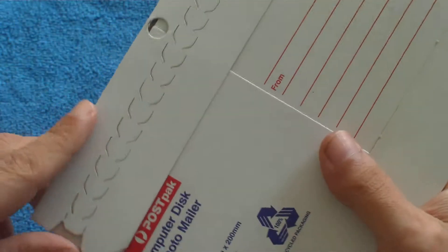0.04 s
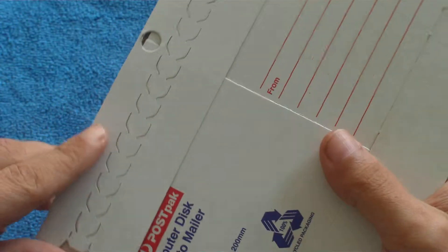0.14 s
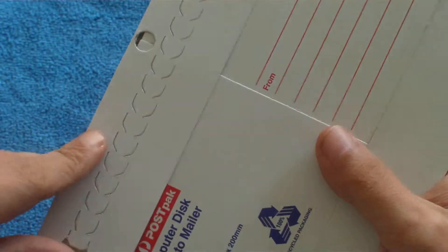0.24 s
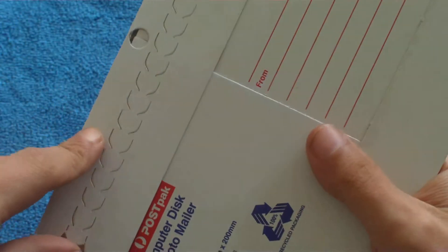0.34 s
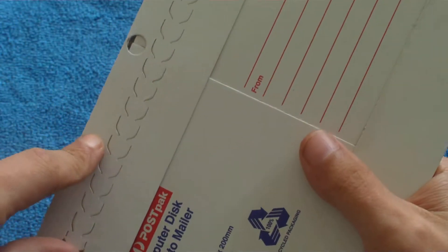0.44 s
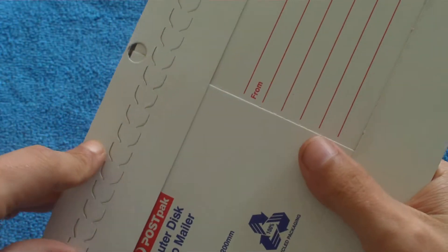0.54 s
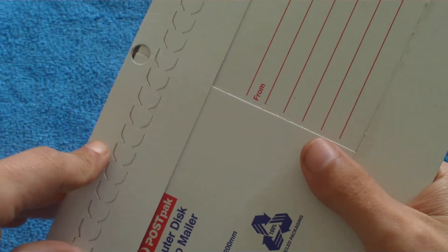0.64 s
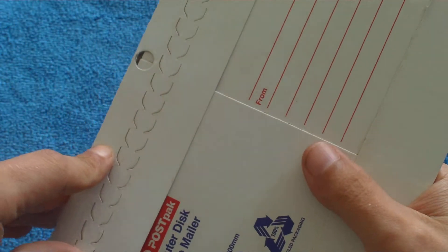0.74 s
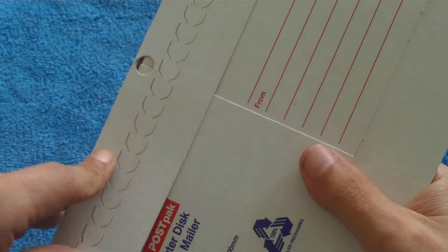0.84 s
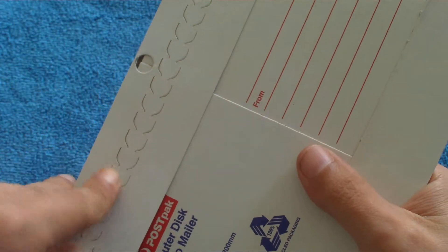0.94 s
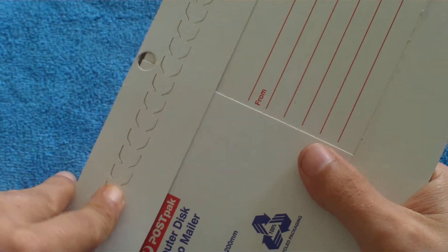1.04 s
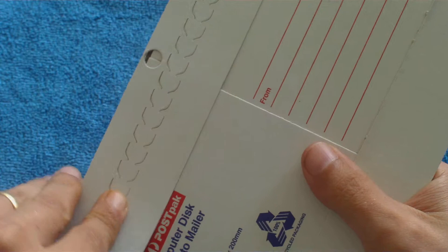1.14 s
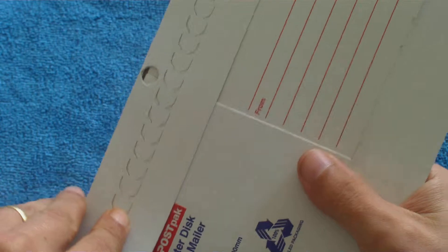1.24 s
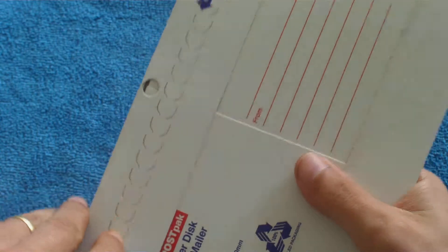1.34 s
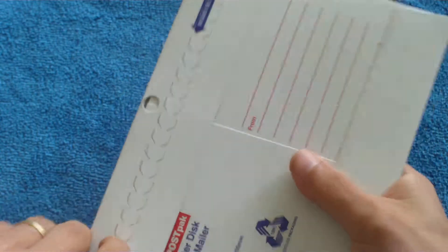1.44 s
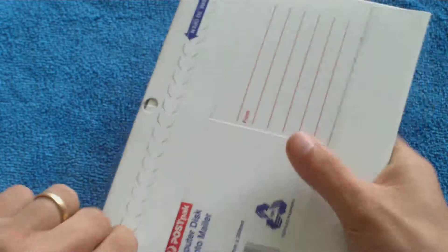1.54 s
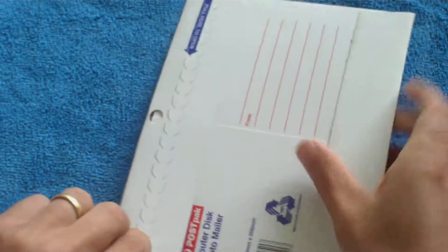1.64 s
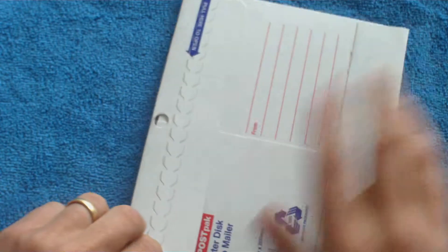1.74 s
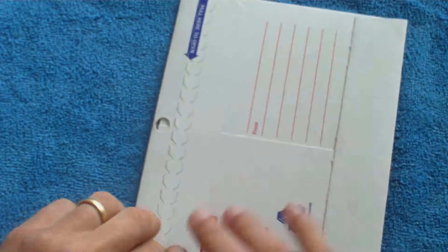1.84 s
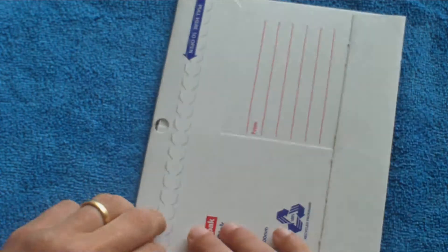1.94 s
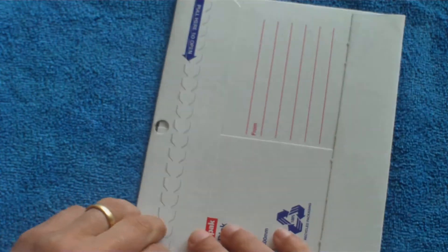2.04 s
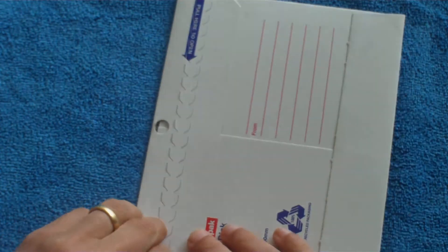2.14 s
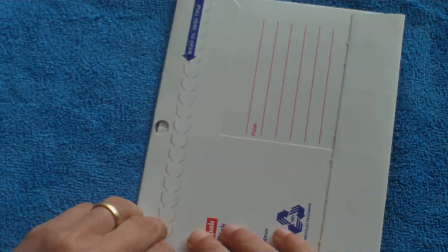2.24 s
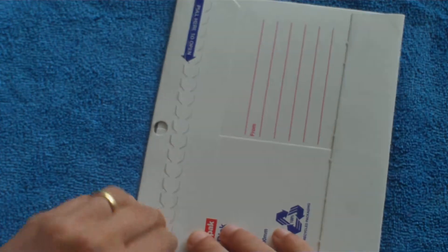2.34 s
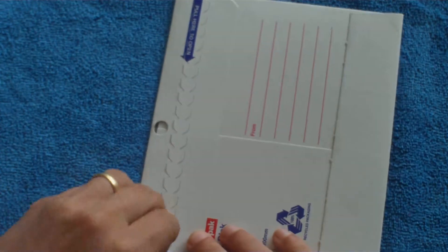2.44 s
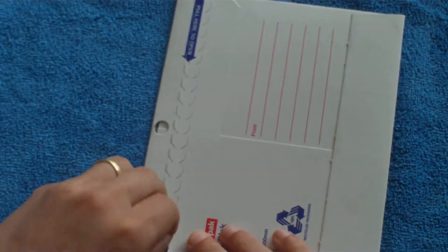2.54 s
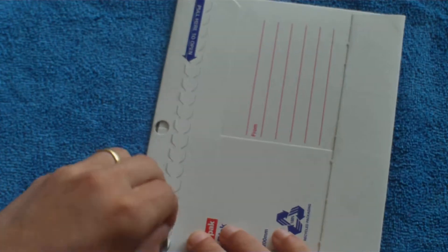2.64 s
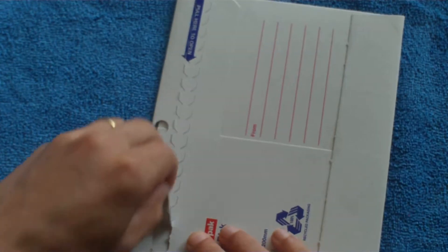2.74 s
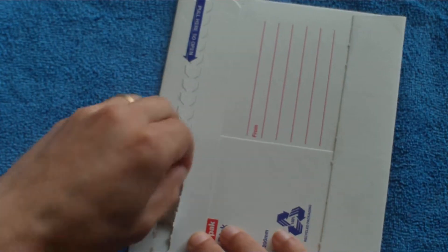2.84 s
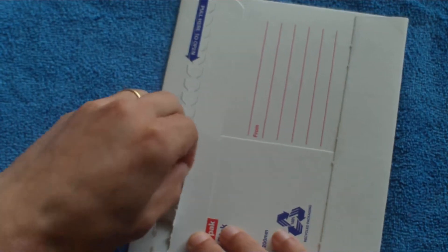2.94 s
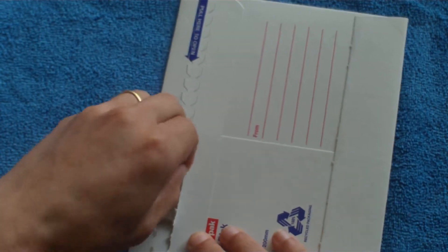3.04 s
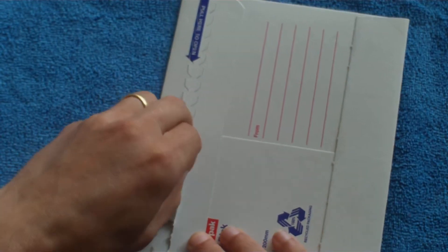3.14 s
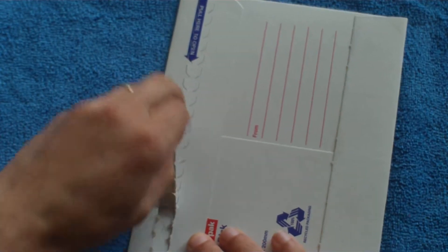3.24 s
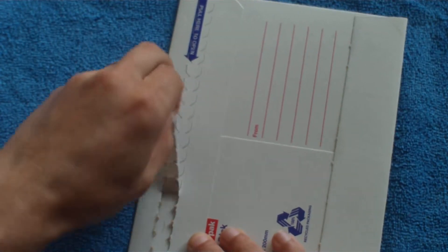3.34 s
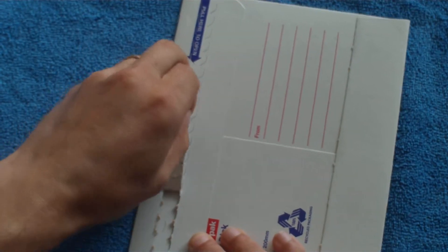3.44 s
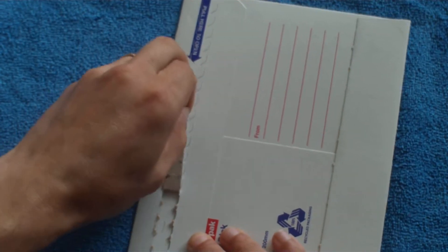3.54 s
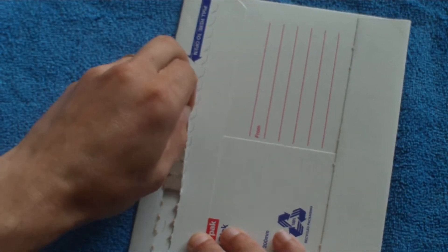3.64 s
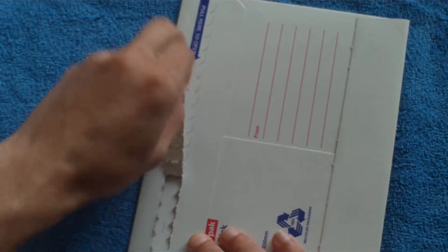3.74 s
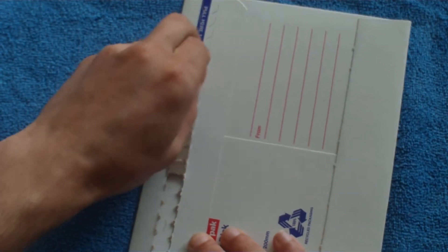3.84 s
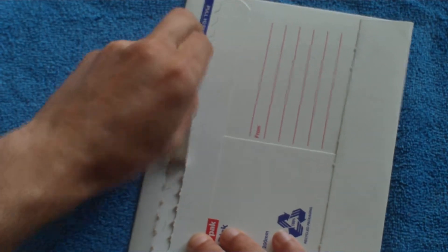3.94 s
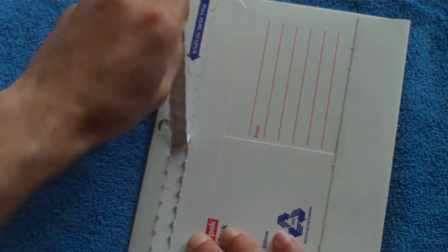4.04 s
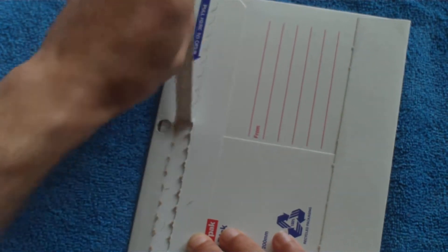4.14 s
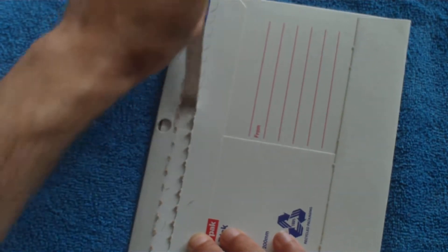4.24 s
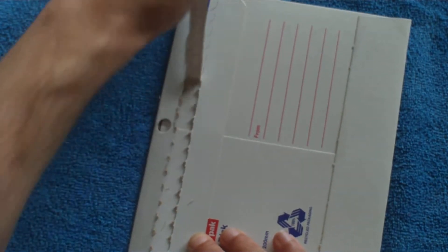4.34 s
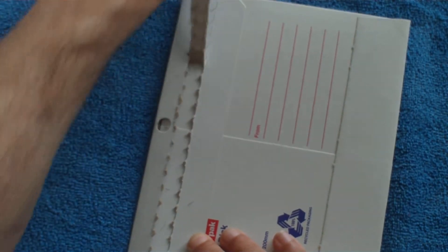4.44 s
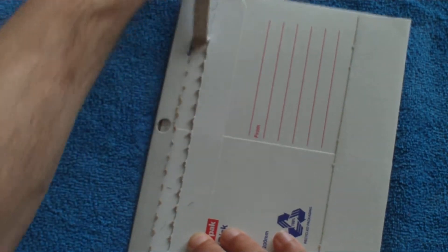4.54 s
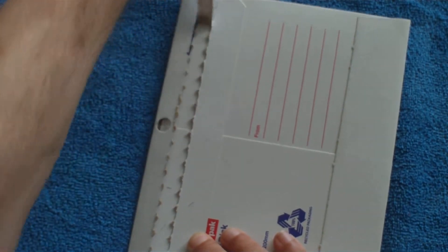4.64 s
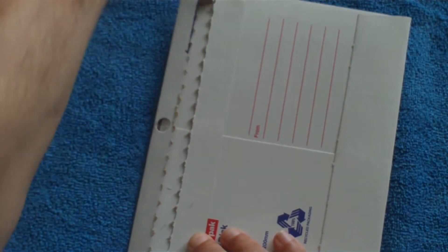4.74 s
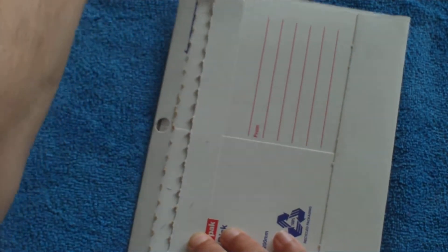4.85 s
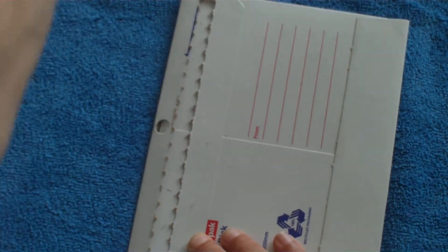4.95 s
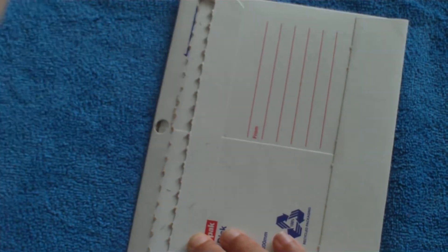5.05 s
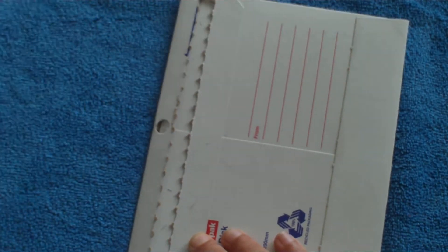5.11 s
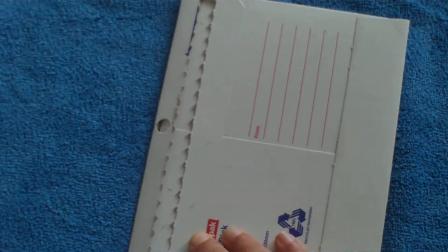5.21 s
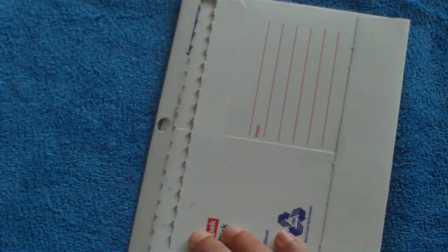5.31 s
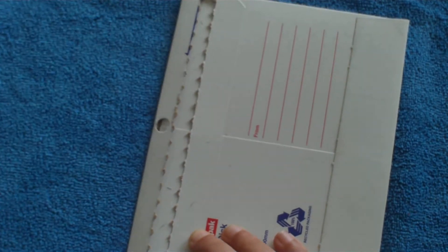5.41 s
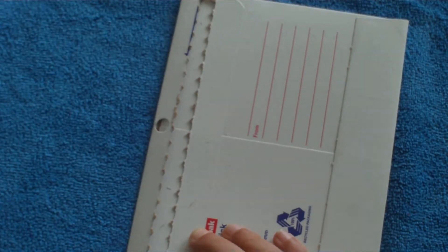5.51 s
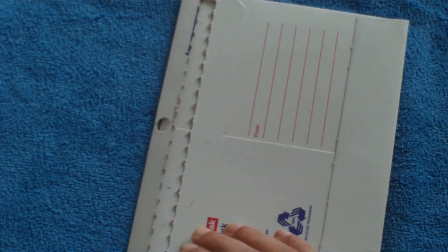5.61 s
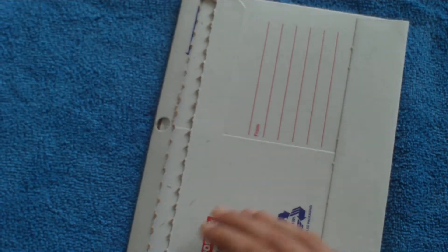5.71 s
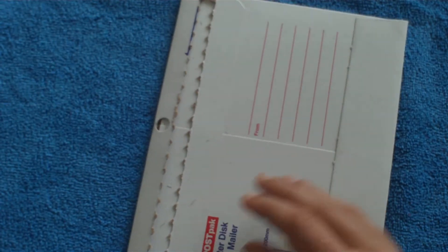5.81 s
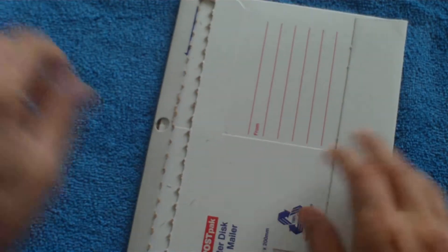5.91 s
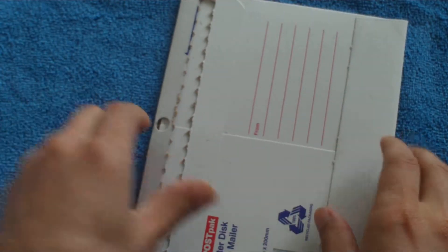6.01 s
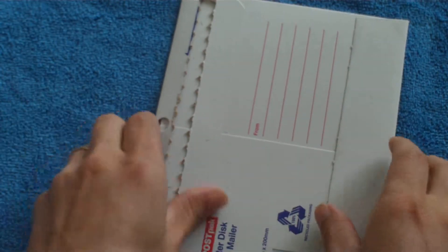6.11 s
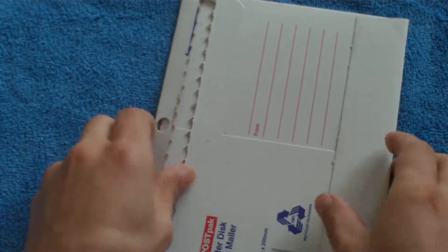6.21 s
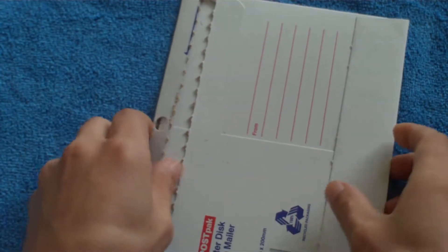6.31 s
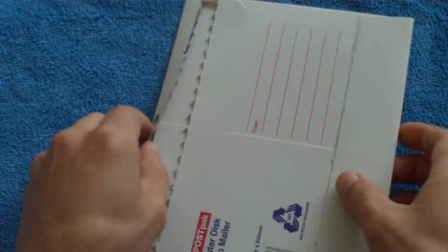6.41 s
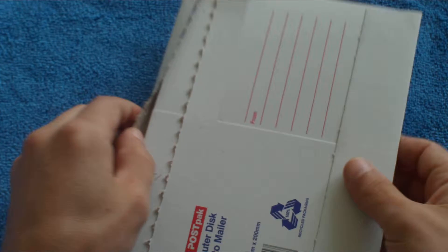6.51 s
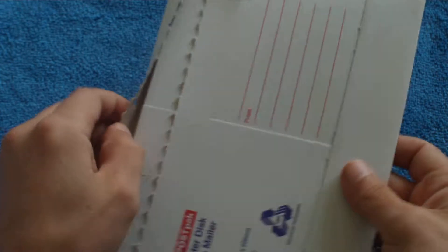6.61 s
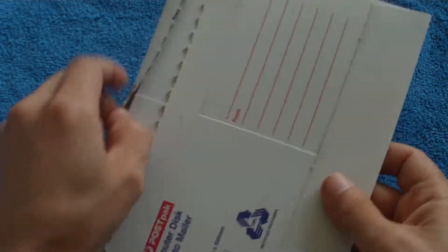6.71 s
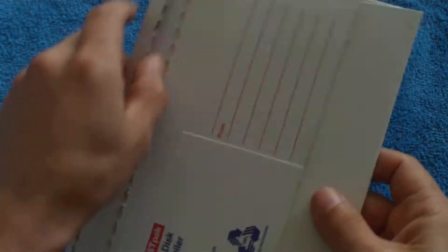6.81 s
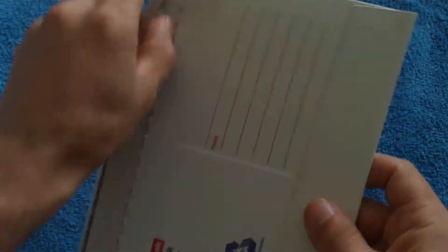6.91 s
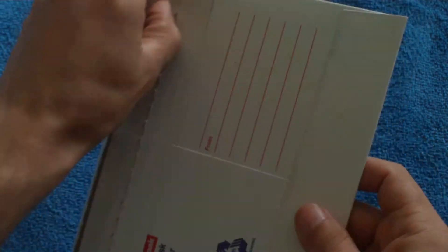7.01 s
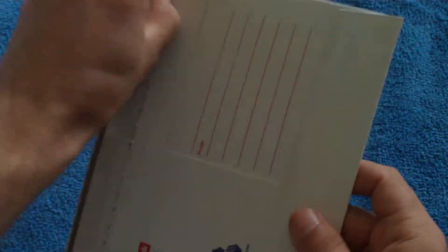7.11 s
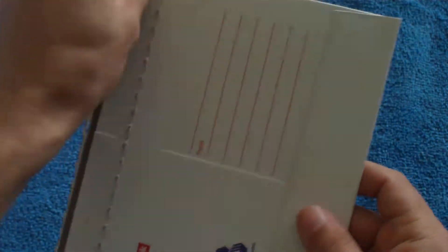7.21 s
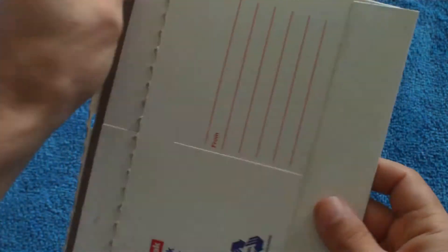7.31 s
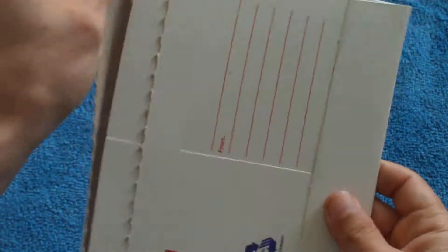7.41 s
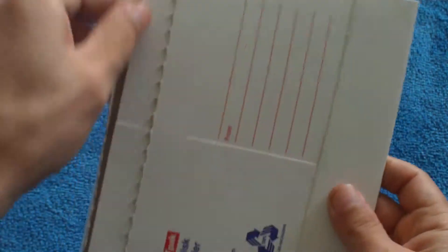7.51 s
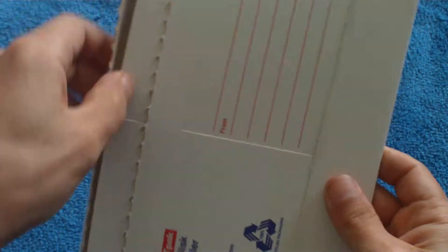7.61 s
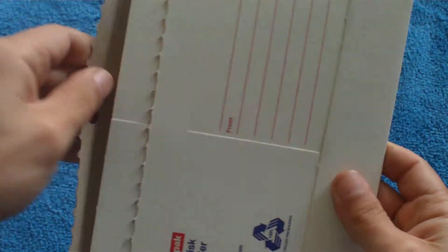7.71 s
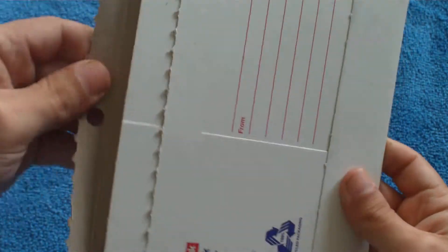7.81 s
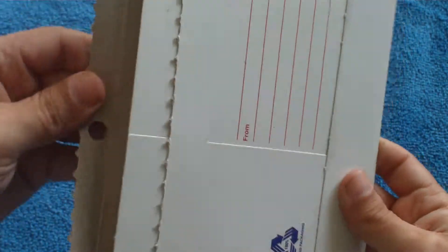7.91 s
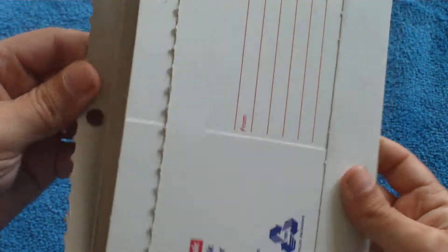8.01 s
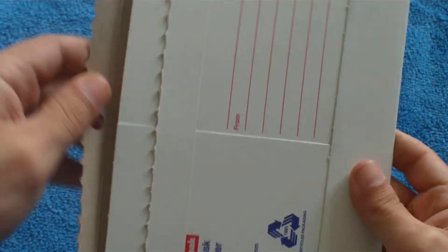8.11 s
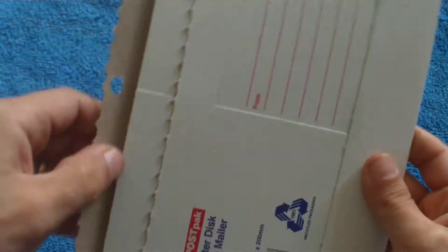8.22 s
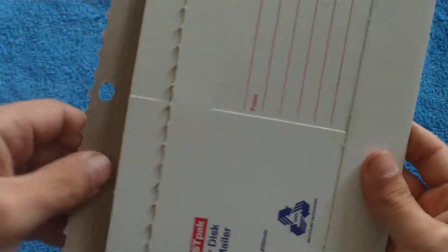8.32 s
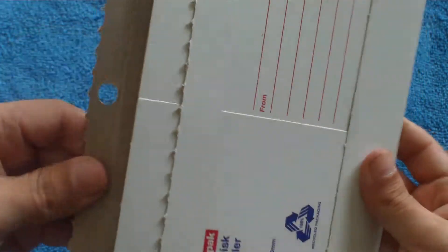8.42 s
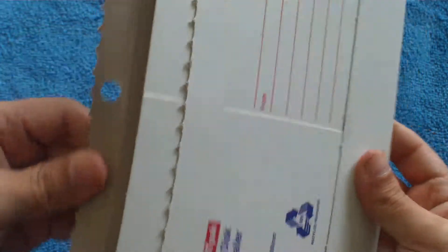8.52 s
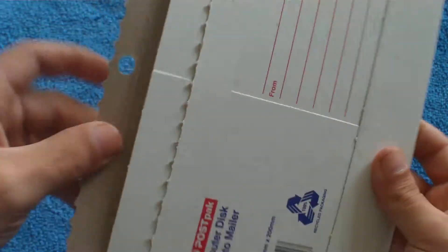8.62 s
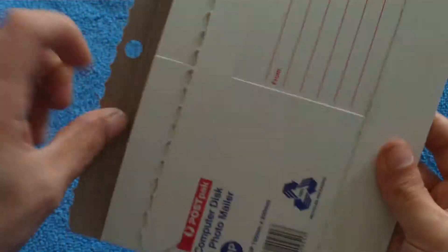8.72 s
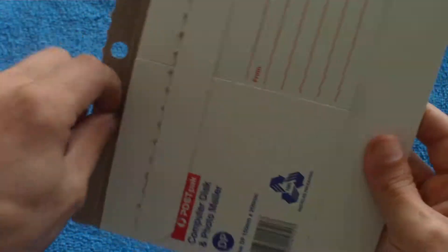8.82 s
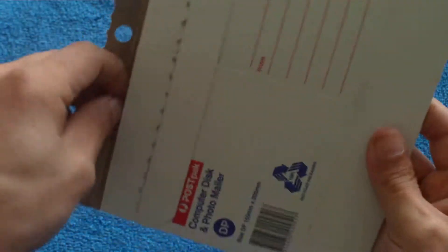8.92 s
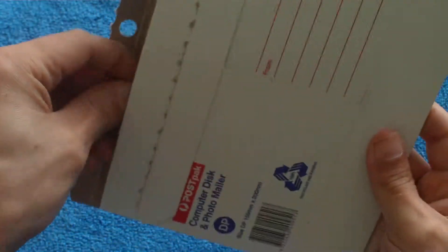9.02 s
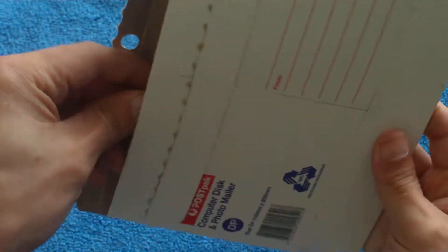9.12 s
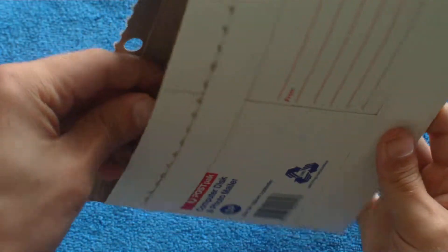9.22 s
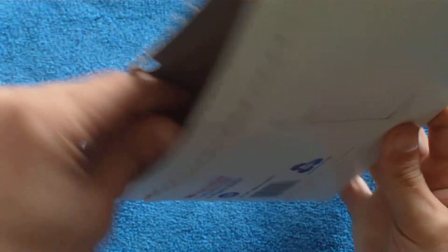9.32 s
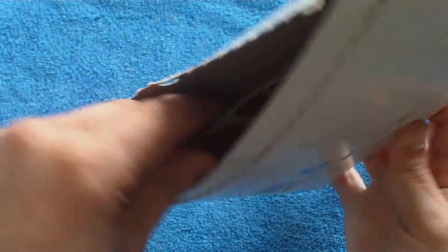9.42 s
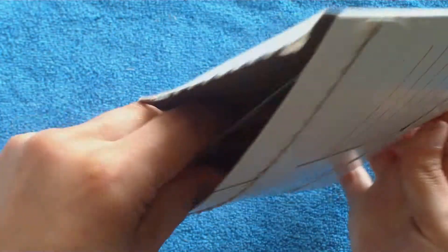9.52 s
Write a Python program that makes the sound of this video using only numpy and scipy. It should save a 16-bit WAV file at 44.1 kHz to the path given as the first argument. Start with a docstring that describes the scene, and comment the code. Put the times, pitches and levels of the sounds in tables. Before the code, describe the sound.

Loud, dry cardboard pops accelerate as a tear strip is pulled, followed by quiet handling rustles and a few light clicks indoors.

```python
"""Perforation bridges snap as hands pull the tear strip of a stiff cardboard mailer lying on a towel, close by:
each snap is a noise burst of a few ms that excites resonances of body, panel, strip and cut edge.
Fibres crackle between the snaps and fingers and towel rub the board: uneven grains over a fine hiss,
through fixed resonances. A small room of sparse decaying taps answers; steady hiss, a low hum and
a late drone lie underneath. The loudest snaps overload the input, and one microphone feeds both channels."""
import sys
import numpy as np
from scipy import signal
from scipy.fft import rfft, irfft
from scipy.io import wavfile
from scipy.ndimage import uniform_filter1d, map_coordinates

SR = 44100
rng = np.random.default_rng(int(sys.argv[2]) if len(sys.argv) > 2 else 0)


def int16_out(signal):
    """Quantize to a 16-bit WAV file."""
    q = np.round(np.clip(np.atleast_2d(signal).T, -1, 1) * 32767)
    wavfile.write(sys.argv[1], SR, q.astype(np.int16))


N = 421596


def gain_of(db):
    """Level law: decibels to amplitude ratio."""
    return 10 ** (np.asarray(db) / 20)


def evened(x):
    """Power normalization: scales to rms 1."""
    return x / np.sqrt(np.mean(x ** 2) + 1e-20)


def read(points, hz):
    """Spectral interpolation: reads a frequency table on a log-frequency axis."""
    f, value = np.transpose(points)
    return np.interp(np.log(hz + 1), np.log(f + 1), value)


def track(rows, column, outside):
    """Linear interpolation in time: one table column over the scene, a set value outside the rows."""
    rows = np.array(rows)
    return np.interp(np.arange(N) / SR, rows[:, 0], rows[:, column], left=outside, right=outside)


def resonate(x, hz, width):
    """Damped resonance: a pole pair whose radius sets the bandwidth, with a peak gain of about 1."""
    radius = np.exp(-np.pi * width / SR)
    feedback = [1, -2 * radius * np.cos(2 * np.pi * hz / SR), radius * radius]
    return signal.lfilter([1 - radius, 0, radius - 1], feedback, x)


def slow(rate):
    """Band-limited random modulation: cubic curve through `rate` random knots per second, rms 1."""
    knots = rng.standard_normal(int(N / SR * rate) + 3)
    return evened(map_coordinates(knots, [np.arange(N) / SR * rate], order=3))


# spectral shape of the background noise, relative: [hz, level_db]
HISS_SPECTRUM = [(15, -33), (25, -9.5), (65, -8.5), (90, -8), (208, -9.5), (290, -6), (610, -7.5),
                 (910, -7), (2000, -11), (6100, -11.5), (7000, -17), (7250, -26), (7400, -57)]
HISS_DB = -37.5  # rms level, before the faint swells


def hiss():
    """Stationary coloured noise of microphone and room: filtered white noise with faint slow swells."""
    hz = np.fft.rfftfreq(N, 1 / SR)
    spectrum = rfft(rng.standard_normal(N)) * gain_of(read(HISS_SPECTRUM, hz))
    return gain_of(HISS_DB + 0.17 * slow(2.3)) * evened(irfft(spectrum, N))


def wavering_tone(level_db, hz):
    """Frequency modulation: phase is the running sum of pitch; the level is an rms level."""
    return np.sqrt(2) * gain_of(level_db) * np.sin(2 * np.pi * np.cumsum(hz) / SR)


def hum():
    """Sustained sinusoid that wavers slightly in level and pitch around 120 Hz."""
    return wavering_tone(-49.5 + 1.6 * slow(4.7), 120 + 1.35 * slow(4.6))


# bridges and folds that snap; body, panel and strip levels are relative to the edge,
# and burst length is before stretching:
# [start_s, peak_db, burst_ms, body_db, panel_db, panel_hz, strip_db, strip_hz]
SNAPS = [(0.611, -24, 5.5, 1, 4, 915, -1, 2310), (0.972, -20, 4.3, 19, 15, 910, 0, 2940),
         (1.281, -4, 4.4, -9.5, -1, 624, -7, 2810), (1.305, -15.5, 2, 10, 15, 910, 18, 2200),
         (1.386, -23.5, 9.3, 8, 15, 810, 6, 3240), (2.44, 2, 6.6, -8.5, 5.5, 1215, -6, 3160),
         (2.444, 4.5, 9.9, -3, 14, 979, -7, 3080), (2.708, -7, 9.4, -27, -3, 1090, -6.5, 3120),
         (2.776, 1.5, 4.5, -8, -7.5, 800, -12.5, 2040), (2.808, -7, 8.1, -19, 0.5, 1030, -1, 1810),
         (2.857, -2, 10, -14, -3, 1090, -1, 3100), (3.322, -6, 4.9, -12, 8, 1060, 3, 3200),
         (3.327, 2, 6.4, -21.5, -5.5, 1050, -12, 3160), (3.38, -8.5, 7.5, -6, -1, 1180, -4, 2960),
         (3.394, 3.5, 3.7, -32, -10, 980, -14, 2950), (3.804, -11, 12, -21, -9.5, 1440, -14, 2750),
         (3.814, -8, 3.2, -9.5, -1, 1010, -9, 2960), (3.825, 1, 4.9, -26, -13, 1320, -16, 2880),
         (4.043, -9.5, 11, -12, -4, 1060, -8, 2620), (4.051, 1, 6.7, -33, -11, 1040, -12, 3020),
         (4.056, -5.5, 5.1, -16, 1, 1020, -7, 2720), (4.094, -1.5, 4.2, -8, 5, 895, -13, 2260),
         (4.098, 2, 6.5, -8, -22, 1020, -13.5, 2930), (4.154, -7, 4.3, -5, -5, 940, -7, 3100),
         (4.175, -6, 7, -5, -15, 940, -9.5, 2180), (4.229, -11.5, 8.1, -10, -15.5, 1430, -1, 2950),
         (4.249, -5.5, 5.8, -10, -4, 1000, -3, 2320), (4.318, 0, 3, -26, -25, 837, -10, 2240),
         (4.323, -6, 6.5, -20, -8.5, 1040, -3, 2230), (4.389, -4.5, 11.6, -14, -3.5, 905, -6.5, 2080),
         (4.444, 0.5, 5.1, -17, 3, 906, -3.5, 2060), (4.497, 0, 4.1, -24, -8, 1290, 3, 2130),
         (4.506, -8.5, 7.8, -7, -6, 1390, -11, 2310), (4.559, -5.5, 7, -8, 1.5, 840, 7, 2180),
         (4.571, -5, 9.3, -22, -5, 1050, -1, 2300), (4.636, -6, 7.8, -9.5, -8, 1044, 4, 1990),
         (4.644, -7.5, 8.7, -11, -12, 1430, -2, 2320), (4.714, -0.5, 5.4, -14, -6.5, 1010, -8.5, 2330),
         (4.772, -14, 10, -2, 8, 947, 7, 2400), (4.783, -1.5, 4.7, -7, 4, 1030, 3.5, 2240),
         (4.835, -5, 4.6, -7, 5, 1040, -13, 2370), (4.854, -5, 6.9, -19, -5, 1020, -2.5, 2250),
         (5.275, -9.5, 11.5, -8.5, 3, 1100, 10.5, 2250), (5.751, -25, 5.7, 3, 13, 1070, -5, 2730),
         (5.812, -17.5, 6.1, 9, 12, 720, 7, 2960), (7.0, -19.5, 8.1, -22, -6, 748, -15, 2350),
         (7.051, -14, 4.3, -13, 0, 1010, 6, 3010), (7.056, -16, 7.6, -18, 8, 1440, -3, 1670),
         (7.129, -13, 5.4, 3, 14, 1230, 7, 2740), (7.209, 1.5, 4.1, -9, 2.5, 820, 1, 2300),
         (7.484, -24, 4.9, -3, 16, 640, 6, 2330), (8.91, -14.5, 4.2, 11, 7.5, 923, 5, 2340),
         (8.945, -22, 6.4, -5.5, -2.5, 650, -7, 2370), (9.122, -16.5, 7.5, -5, 16.5, 1600, 16, 1940),
         (9.131, -20, 4.2, 6, 3, 931, 14, 2100), (9.315, -17.5, 9.2, -7, 12, 950, 5, 1960),
         (9.324, -18, 4.3, 3, 20, 965, 21, 2090)]
# bandwidths of the three ways the board rings, for a usual burst before spreading:
# [panel_hz, strip_hz, edge_hz]
RING_WIDTHS = [212, 280, 700]
# mean pitch of the ringing cut edge, wandering up and down between about 4.4 and 6 kHz:
# [time_s, pitch_hz]
EDGE_PITCH = [(1.3, 5520), (2.4, 5520), (3.85, 5980), (4.1, 5180), (4.2, 4840), (4.4, 5850), (4.53, 4520),
              (4.64, 5630), (4.73, 4550), (4.85, 5350), (5.27, 4430), (7.0, 4500), (9.5, 5000)]
EDGE_SCATTER = 0.021  # share by which that pitch scatters from snap to snap
BODY_HZ, BODY_WIDTH_HZ = 502, 224  # the whole mailer flexes; width before spreading
USUAL_MS, DAMPING_POWER = 5.9, 0.61  # a burst shorter than usual rings wider and drier, by this power
LEAD_DB, TRAIL_DB = -23, -23  # crackle at the snap, relative to the burst, before its unevenness
LEAD_SLOPE, TRAIL_SLOPE = 2200, 240  # crackle level rising before and falling after, dB per s
SNAP_LENGTH, SNAP_ONSET = 5120, 2048  # samples


def snap_force(t, burst_ms, crackle_noise):
    """Fracture as impulsive excitation: growing fibre crackle, a brief burst, trailing loose fibres."""
    progress = np.clip(t * 1000 / max(burst_ms, 1), 0, 1)
    burst = np.sin(np.pi * progress ** 0.48) ** 2  # quick rise, slower release
    unevenness = gain_of(4 * evened(uniform_filter1d(crackle_noise, size=40)))
    lead = gain_of(LEAD_DB - abs(t) * LEAD_SLOPE)
    trail = gain_of(TRAIL_DB - abs(t) * TRAIL_SLOPE)
    return burst + unevenness * np.where(t < 0, lead, trail)


def snaps(spread, stretch):
    """Modal excitation: each force burst rings body, panel, strip and edge through double resonances."""
    out = np.zeros(N + SNAP_LENGTH)
    t = (np.arange(SNAP_LENGTH) - SNAP_ONSET) / SR
    noise = rng.standard_normal((len(SNAPS), 5, SNAP_LENGTH))
    for row, shake in zip(SNAPS, noise):
        start_s, peak_db, ms, body_db, panel_db, panel_hz, strip_db, strip_hz = row
        force = snap_force(t, stretch * ms, shake[3])
        body = resonate(force * shake[4], BODY_HZ, spread * BODY_WIDTH_HZ)
        body = resonate(body, BODY_HZ, 500)
        sound = gain_of(body_db) * body / np.linalg.norm(body)
        edge_hz = np.interp(start_s, *np.transpose(EDGE_PITCH)) * (1 + EDGE_SCATTER * shake[3, 0])
        modes = [(panel_db, panel_hz), (strip_db, strip_hz), (0, edge_hz)]
        damping = (USUAL_MS / max(ms, 1)) ** DAMPING_POWER
        for k, (db, hz) in enumerate(modes):
            width = spread * RING_WIDTHS[k] * damping
            ring = resonate(resonate(force * shake[k], hz, width), hz, 2.6 * width)
            sound = sound + gain_of(db) * ring / np.linalg.norm(ring)
        at = round(start_s * SR) - SNAP_ONSET
        out[at:at + SNAP_LENGTH] += gain_of(peak_db) * sound / abs(sound).max()
    return out[:N]


def thumps(cracks):
    """Low-frequency impulse response: each snap jolts the sheet against the table in a soft, slow push."""
    push = uniform_filter1d(abs(cracks), size=600, origin=299)  # mean over the preceding samples
    return resonate(push, 45, 14)


# reverberation time of the room: [band_hz, t60_s]
ROOM = [(300, 0.71), (800, 0.41), (2100, 0.4), (5500, 0.35)]


def room(x):
    """Reverberation: sparse random taps after the nearest-wall delay, each band decaying by its own t60."""
    taps = np.zeros(SR // 2)
    at = np.arange(320, SR // 2 - 20, 20)
    taps[at + rng.integers(0, 20, len(at))] = rng.choice([-1., 1.], len(at))
    hz, t, bands = signal.stft(taps, SR, nperseg=128)
    decay = gain_of(-60 * t / read(ROOM, hz)[:, None])
    tail = signal.istft(bands * decay, SR, nperseg=128)[1]
    return signal.fftconvolve(x, tail / np.linalg.norm(tail))[:N]


# resonances of the board under friction, one list each for panel, strip, edge and flexing sheet;
# levels are relative within a list: [pitch_hz, width_hz, level_db]
BOARD = [
    [(686, 235, -7.5), (996, 183, 3), (1121, 98, 1.5), (1424, 82, -3.5)],
    [(2250, 500, 6), (3010, 250, 7)],
    [(4430, 1100, -2.5), (5350, 440, 2), (5770, 570, 0.5), (6940, 380, -7)],
    [(60, 200, -12.5), (320, 340, -7.5), (515, 390, -8)],
]


def friction(per_s, spread_db, smooth):
    """Stick-slip noise: tiny breaks of uneven size over a fine hiss, filtered by each part of the board."""
    sizes = gain_of(spread_db * np.minimum(rng.exponential(1, N), 4))
    grains = sizes * (rng.random(N) < per_s / SR)
    roughness = evened(uniform_filter1d(grains, size=24)) + smooth
    drive = roughness * rng.standard_normal(N)
    parts = []
    for modes in BOARD:
        sound = np.zeros(N)
        for k, (hz, width, db) in enumerate(modes):
            sound += (-1) ** k * gain_of(db) * resonate(drive, hz, width)  # alternating polarity
        parts.append(evened(sound))
    return parts


# strokes of fingers and towel on the board, levels at the top before flutter:
# [top_s, rise_s, fall_s, panel_db, strip_db, edge_db]
RUBS = [(.9, 0.11, 0.063, -55, -47, -43), (.92, 0.01, 0.025, -35, -52, -55),
        (0.979, 0.013, 0.017, -27, -55, -49), (1.55, 0.23, 0.29, -38, -41.5, -49),
        (1.72, 0.14, 0.088, -40.5, -51, -46), (1.805, 0.036, 0.036, -55, -44, -36.5),
        (2.04, 0.044, 0.039, -40.5, -56, -56), (5.274, 0.0037, 0.022, -37, -30, -38),
        (5.6, 0.41, .5, -42, -43, -42.5), (6.7, 0.024, .08, -38.5, -50, -46),
        (6.845, 0.02, 0.055, -28.5, -46, -40), (6.89, 0.036, 0.067, -42, -34.5, -40),
        (6.99, 0.037, .04, -45, -44, -37), (7.03, .05, 0.052, -35, -41, -39),
        (7.195, 0.035, 0.013, -36, -37, -32), (7.224, 0.016, 0.11, -30.5, -35, -30.5),
        (7.631, 0.19, 0.17, -33.5, -37, -39), (8.267, 0.038, 0.045, -28.5, -36, -37),
        (8.315, 0.025, 0.043, -35.5, -41, -42), (8.64, 0.11, 0.094, -37, -43.5, -47),
        (8.95, 0.47, 0.5, -43.5, -47, -48), (9.13, 0.045, 0.066, -36.5, -43.5, -44),
        (9.325, 0.096, 0.05, -35.5, -47, -46), (9.54, 0.25, .1, -41.5, -47, -45)]
STROKE_DROP_DB = -15.5  # level one rise or fall away from the top of a stroke


def rubs():
    """Sliding friction: skin and cloth strokes swell to a top and die away under level modulation."""
    panel, strip, edge, sheet = friction(1500, 2.3, 1.0)
    t, levels = np.arange(N) / SR, np.zeros((3, N))
    for top_s, rise, fall, *dbs in RUBS:
        away = np.maximum((top_s - t) / max(rise, .005), (t - top_s) / max(fall, .005))
        near = away < 3
        levels[:, near] += gain_of(dbs)[:, None] * gain_of(STROKE_DROP_DB * away[near] ** 1.19)
    parts = panel + 0.26 * sheet, strip, edge  # the sheet flexes along with the panel
    return gain_of(1.9 * slow(40)) * (levels * parts).sum(axis=0)


# fibres parting under the pull; level before flutter and mixing, tilt is edge over panel:
# [time_s, level_db, tilt_db]
TEAR = [(2.36, -44, 3), (2.7, -46.5, -1), (2.88, -30, 3), (3.0, -49.5, 19), (3.12, -52, 8),
        (3.14, -43.5, 20), (3.16, -58, 8), (3.28, -42, 3), (3.47, -39, 0), (3.66, -48, -1),
        (3.78, -41.5, 9), (3.83, -37.5, -14), (3.99, -42.5, 14.5), (4.1, -31.5, -17), (4.22, -30, 10.5),
        (4.3, -28.5, 1.5), (4.68, -33, 5), (4.82, -27, -4), (4.9, -34, 4.5), (4.96, -26.5, 3.5),
        (4.99, -41, -2), (5.05, -43, -2)]
TEAR_STRIP_DB, TEAR_SHEET_DB = -2, -11  # strip against the level, flexing sheet against the panel


def tear():
    """Fracture noise: crackling fibres, with panel, strip, edge and sheet each modulated independently."""
    panel, strip, edge, sheet = (gain_of(1.5 * slow(40)) * part for part in friction(1000, 4, .6))
    swell = gain_of(1.83 * slow(60))
    level = gain_of(track(TEAR, column=1, outside=-120))
    tilt = gain_of(track(TEAR, column=2, outside=0) / 2)  # half up on the edge, half down on the panel
    low = (panel + gain_of(TEAR_SHEET_DB) * sheet) / tilt
    return swell * level * (low + gain_of(TEAR_STRIP_DB) * strip + tilt * edge)


# low drone that swells and fades, rms level before wavering: [time_s, level_db]
DRONE = [(6.1, -56), (6.4, -47), (6.89, -58), (6.98, -48.5), (7.27, -60), (8.08, -47), (8.61, -54.5),
         (8.97, -48), (9.39, -61), (9.55, -51)]


def drone():
    """Amplitude-modulated low sinusoid near 64.2 Hz, late in the scene, wavering in level and pitch."""
    level_db = track(DRONE, column=1, outside=-120)
    return wavering_tone(level_db + 1.3 * slow(5.6), 64.2 + .9 * slow(4))


def scene():
    """Superposition of direct and reverberant sound; the same mono signal feeds both channels."""
    near = snaps(spread=1.0, stretch=0.89)
    rustle = gain_of(-2.5) * tear() + rubs()
    # the walls hear the snaps from all sides, so less narrowly coloured
    to_walls = snaps(spread=2.66, stretch=1.64) + 0.84 * rustle
    mono = near + rustle + gain_of(-10.0) * room(to_walls) + gain_of(-16) * thumps(near)
    mono = mono + hiss() + hum() + drone()
    return np.array([mono, mono])


BAND_LIMIT_HZ = 7400


def record(dry):
    """Nonlinear overload, then band limitation: hard clipping at full scale and a linear-phase low-pass."""
    clipped = np.clip(dry, -1, 1)
    low_pass = signal.firwin(701, BAND_LIMIT_HZ, window=("kaiser", 9), fs=SR)
    return signal.oaconvolve(clipped, low_pass[None], "same")


dry = scene()
out = record(dry)
int16_out(out)
```